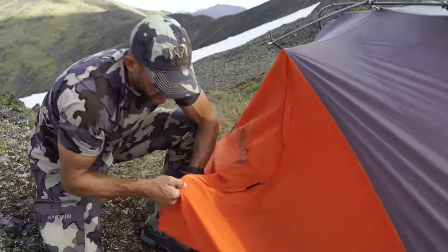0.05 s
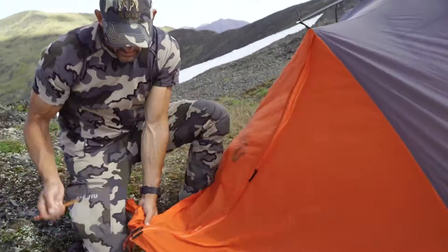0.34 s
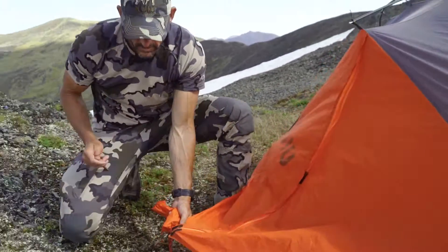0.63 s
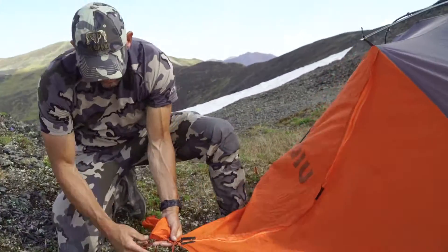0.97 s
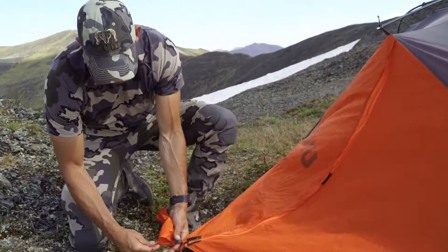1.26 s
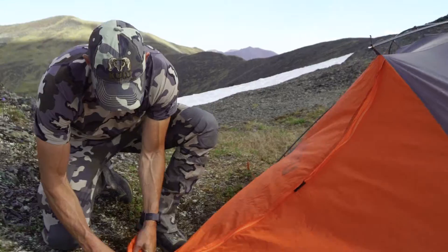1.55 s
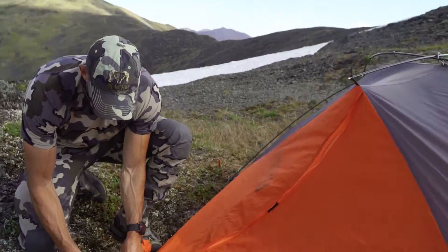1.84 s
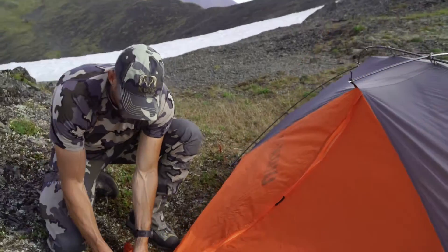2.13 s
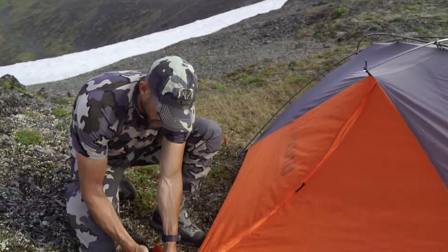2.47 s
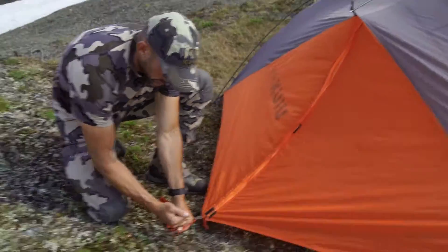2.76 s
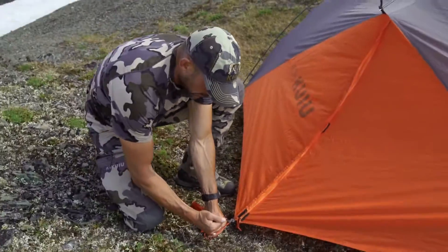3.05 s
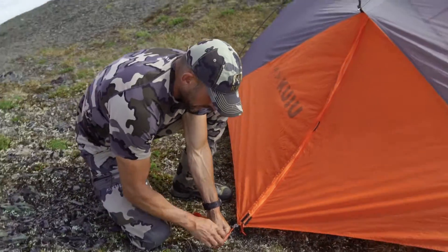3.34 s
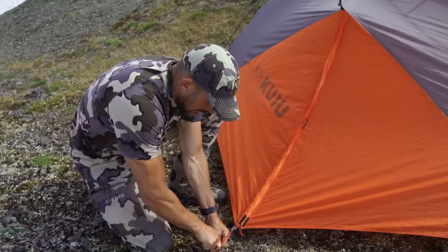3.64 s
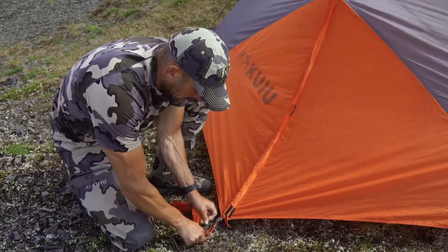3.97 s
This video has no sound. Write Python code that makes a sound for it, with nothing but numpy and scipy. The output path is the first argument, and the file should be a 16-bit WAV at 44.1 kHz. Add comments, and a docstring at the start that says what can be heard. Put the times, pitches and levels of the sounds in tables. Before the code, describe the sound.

Tent fabric swishes and snaps taut, then rustles more and more quietly as it is staked down on stony ground. Faint scrapes, ticks and dull knocks follow, while wind rumbles on the microphone, harder near the end.

```python
"""Nylon swishes and crinkles as a tent door is pulled out, then snaps taut in a run of cracks.
It is staked down by hand on a stony slope: the cloth keeps sliding, more and more quietly,
knees and hands scrape the grit, pegs tick, and stones knock dully in the turf.
Wind rumbles on the microphone throughout and buffets it harder towards the end."""
import sys
import numpy as np
from scipy import signal
from scipy.fft import rfft, irfft
from scipy.io import wavfile
from scipy.ndimage import uniform_filter1d

SR = 44100
rng = np.random.default_rng(int(sys.argv[2]) if len(sys.argv) > 2 else 0)


def bounce(signal):
    """Save signal as a 16-bit WAV file at the path given by the first command-line argument."""
    frames = np.transpose(np.atleast_2d(signal))
    limited = np.clip(frames, -1, 1)
    pcm = np.round(limited * 32767).astype(np.int16)
    wavfile.write(sys.argv[1], SR, pcm)


N = 176400  # 4 seconds
TIME = np.arange(N) / SR
TOP_HZ = 15750

# The tone of sliding nylon. Each row: frequency in Hz, strength in dB.
CLOTH_TONE = [(100, -13.5), (250, 4), (600, 0.5), (1000, -0.5), (1450, 1.5), (2600, -3), (3500, -0.5),
              (4900, -8.5), (8500, -1.5), (12000, -2.5), (16000, -6.5)]
# Steady stirring that dies down as the door tightens. Each row: time in seconds, level in dB.
CLOTH_STIR = [(0, -36), (.25, -35), (.37, -42), (.49, -40.5), (.57, -47.5), (.9, -42.5), (1.05, -48.5),
              (1.3, -47.5), (2.3, -59), (2.38, -53), (2.8, -55.5), (3.05, -60), (3.4, -50.5), (3.65, -56.5),
              (4, -50.5)]
# Single slides. Each row: middle in seconds, rough length in seconds, swish in dB, treble in dB.
CLOTH_SLIDES = [(0.184, 0.043, -32, -41), (0.344, 0.036, -36.5, -42), (0.436, 0.094, -37, -40),
                (0.618, 0.065, -42, -47), (0.671, 0.019, -41, -48), (0.79, 0.19, -43, -44),
                (0.872, 0.072, -41.5, -43), (0.954, 0.057, -39, -42.5), (1.121, 0.09, -44, -46),
                (1.18, 0.063, -41, -44), (1.243, 0.039, -41, -42), (1.491, 0.1, -44.5, -47.5),
                (1.647, 0.093, -45.5, -52), (1.855, 0.22, -48.5, -53.5), (2.008, 0.082, -49, -52),
                (2.144, 0.12, -49.5, -51), (2.266, 0.21, -50, -56), (2.596, 0.069, -51, -52),
                (2.794, 0.055, -51, -62), (3.163, 0.036, -51, -52), (3.244, 0.078, -57, -50.5),
                (3.53, 0.062, -80, -57.5)]


def cloth(split_hz=6000):
    """Nylon rubs and crinkles; each slide has its own mix of lower swish and higher treble."""
    friction = undb(-2) * rng.standard_normal(N)
    nylon = moving_folds(colour(friction + undb(-3.5) * crinkles(), CLOTH_TONE))
    swish = cut(nylon, split_hz, "low", order=5)
    swish /= np.std(cut(swish, 2500, "high", order=5))  # its upper part sets the level
    treble = unit(cut(nylon, split_hz, "high", order=5))
    swish_gain = curve(CLOTH_STIR)
    treble_gain = swish_gain * undb(-6.5)
    catch = undb(1.3 * wander(per_s=55))  # sliding cloth catches and slips
    for middle, length, swish_db, treble_db in CLOTH_SLIDES:
        move = swell(middle, length) * catch
        swish_gain = np.hypot(swish_gain, undb(swish_db) * move)
        treble_gain = np.hypot(treble_gain, undb(treble_db) * move)
    return swish * swish_gain + treble * treble_gain


def crinkles(decay_s=0.00075):
    """Creases buckle at random, each with a tiny rattle of its own."""
    buckles = grains(per_s=650, spread_db=3.5)
    energy = signal.lfilter([1], [1, -np.exp(-2 / (decay_s * SR))], buckles ** 2)
    return unit(np.sqrt(energy) * rng.standard_normal(N))


def moving_folds(rest, flicker_db=2.5):
    """Moving folds shift the cloth's tone: each band, from low to high, flickers on its own."""
    out = 0
    for hz in 500 * 2 ** np.arange(5):
        band = cut(cut(rest, hz, "low")[::-1], hz, "low")[::-1]  # both ways, so it is not delayed
        out += band * undb(flicker_db * wander(per_s=30.21))
        rest = rest - band
    return out + rest


# The tone of the taut sheet. Each row: frequency in Hz, strength in dB.
SHEET_TONE = [(80, -2), (200, -3.5), (400, -1), (750, -6.5), (1000, -20.5), (1300, -14), (2500, -14),
              (3500, -16), (5500, -22.5), (11000, -30.5), (16000, -32)]
# Its cracks. Each row: start in seconds, peak in dB, decay in seconds.
SHEET_CRACKS = [(0.2514, -5, 0.0025), (0.2554, -10.5, 0.009), (0.2601, -4, 0.0031), (0.2659, -16.5, 0.012),
                (0.27, -18, 0.011)]


def snap():
    """The slack sheet pulls taut in a quick run of cracks."""
    out = np.zeros(N)
    for start, db, decay_s in SHEET_CRACKS:
        crack = colour(burst(decay_s, click=4.1), SHEET_TONE)
        add(out, start, peak(crack, db))
    return out


# Creases, pegs and grit. Each row: start in seconds, peak in dB, ring in Hz, decay in seconds.
SHARP_TICKS = [(0.0123, -12, 3500, 0.00059), (0.139, -17.5, 1360, 0.0036), (0.2513, -9.5, 11000, 0.00026),
               (0.2686, -20, 12000, .0008), (0.3075, -14, 3200, 0.0006), (.393, -20, 4600, 0.0016),
               (0.4012, -18.5, 3580, .001), (.6055, -33, 4500, 0.00097), (.667, -32, 5500, 0.0011),
               (0.732, -24, 4950, 0.002), (1.352, -32, 12100, .0005), (1.401, -33, 9200, 0.00042),
               (1.4605, -31, 9500, .0005), (1.4886, -18.5, 1760, 0.0022), (1.614, -33, 890, 0.0031),
               (2.145, -32, 3000, .002), (2.462, -31, 1250, 0.0011), (2.512, -32.5, 1770, 0.0016),
               (3.3984, -27.5, 1170, 0.0016), (3.817, -31.5, 3300, .0012)]


def ticks():
    """Brief contacts, each with one broad ring; the lower the ring, the softer the contact."""
    out = np.zeros(N)
    for start, db, hz, decay_s in SHARP_TICKS:
        tick = ring(burst(decay_s, click=0.15), hz, width=0.46)
        tick = cut(tick, min(1.8 * hz, TOP_HZ), "low")
        add(out, start, peak(tick, db))
    return out


# Stones pressed into turf. Each row: start in seconds, peak in dB, ring in Hz, decay in seconds.
STONE_KNOCKS = [(0.821, -26.5, 286, 0.0078), (0.869, -18.5, 306, 0.0063), (1.28, -25.5, 236, 0.0058),
                (1.485, -32.5, 220, 0.0081), (2.072, -23.5, 757, 0.0067), (2.0835, -29.5, 830, 0.0035),
                (2.3248, -28, 1240, 0.0037), (2.328, -26, 340, 0.0092), (2.339, -28, 1380, 0.0036),
                (2.734, -29, 740, 0.0032), (2.806, -29, 810, 0.0053), (3.324, -30, 680, 0.0062),
                (3.4706, -21, 357, 0.012)]


def knocks(muffle_hz=1500):
    """Stones knock with one short tone and a gritty rattle, muffled by turf."""
    out, t = np.zeros(N), TIME[:SR // 10]
    for start, db, hz, decay_s in STONE_KNOCKS:
        rattle = ring(burst(decay_s, click=0.98), hz, width=1)
        rattle = peak(cut(rattle, muffle_hz, "low"), 0)
        tone = undb(-4) * np.sin(2 * np.pi * hz * t) * np.exp(-t / decay_s)
        add(out, start, peak(rattle + tone, db))
    return out


# Short rasps: scrapes on grit, sliding nylon or cord, and the tail of the sheet's snap.
# Each row: start in seconds, length in seconds, level in dB before fading, centre in Hz.
RASPS = [(0.278, 0.022, -22.5, 1010), (0.63, 0.077, -34.5, 403), (0.969, 0.077, -33.5, 1270),
         (1.209, 0.074, -29.5, 1550), (1.276, 0.046, -31.5, 1490), (1.61, 0.17, -45.5, 990),
         (2.3, 0.041, -40, 1510), (2.596, 0.029, -38, 1190), (2.485, 0.41, -42, 1020),
         (2.717, 0.066, -52, 12500), (3.2, 0.14, -44, 4570), (3.311, 0.057, -30.5, 1070),
         (3.366, 0.1, -40, 970), (3.667, 0.24, -46.5, 840)]


def rasps():
    """Dense grains swell and fade in each rasp."""
    out, roughness = np.zeros(N), grains(per_s=2500, spread_db=2)
    for start, length, db, hz in RASPS:
        progress = (TIME - start) / length
        fade = np.clip(np.minimum(progress / 0.48, (1 - progress) / 0.99), 0, 1)  # quick in, slow out
        rasp = cut(ring(roughness, hz, width=1), min(1.54 * hz, TOP_HZ), "low", order=4)
        out += undb(db) * fade * unit(rasp)
    return out


# The tone of the wind's rumble. Each row: frequency in Hz, strength in dB.
RUMBLE_TONE = [(8, -28), (18, 12), (32, 6), (55, -4), (80, -15), (130, -25.5), (300, -37.5), (1000, -95.5)]
# Its rise and fall. Each row: time in seconds, level in dB.
RUMBLE_LEVELS = [(0, -18.5), (.35, -26), (.6, -16.5), (1.05, -17.5), (1.35, -24.5), (1.75, -21.5),
                 (1.9, -24.5), (2.08, -14.5), (2.2, -24), (2.55, -27), (2.72, -18), (3.3, -20),
                 (3.55, -14.5), (4, -12)]


def rumble(sway_db=2):
    """Wind swirls on the microphone in a deep rumble that sways in strength."""
    pressure = steady(colour(rng.standard_normal(N), RUMBLE_TONE))
    return pressure * curve(RUMBLE_LEVELS) * undb(sway_db * wander(per_s=5.5))


# Gusts. Each row: middle in seconds, rough length in seconds, level in dB, upper edge in Hz.
WIND_GUSTS = [(0.428, 0.092, -27.5, 112), (0.87, 0.2, -26.5, 117), (1.086, 0.36, -26.5, 74),
              (2.789, 0.14, -38, 226), (2.954, 0.064, -22.5, 71.5), (3.091, 0.14, -20.5, 81.5),
              (3.515, 0.21, -16.5, 90), (3.702, 0.08, -17.5, 97), (3.952, 0.36, -11.5, 113)]


def gusts():
    """Gusts buffet the microphone with swells of low noise."""
    out = np.zeros(N)
    turbulence = cut(rng.standard_normal(N), hz=55.4, kind="high", order=3)
    for middle, length, db, hz in WIND_GUSTS:
        out += undb(db) * swell(middle, length) * steady(cut(turbulence, hz, "low", order=4))
    return out


# Low thumps. Each row: middle in seconds, level in dB before fading, pitch in Hz, width in seconds.
LOW_THUMPS = [(0.825, -12, 136, 0.0017), (.872, -10, 69, 0.0056), (1.241, -23.5, 150, 0.0014),
              (1.475, -22, 112, 0.0027), (1.589, -25, 115, 0.0054), (1.631, -30, 166, 0.0024),
              (3.378, -8.5, 96, 0.0032), (3.473, -3, 134, 0.0024), (3.49, -8, 106, 0.0033)]


def thumps():
    """Each thump at the microphone is a low tone that fades in and out almost at once."""
    out = np.zeros(N)
    for middle, db, hz, width in LOW_THUMPS:
        t = TIME - middle
        out += undb(db) * np.sin(2 * np.pi * hz * t) * np.exp(-.5 * (t / width) ** 2)
    return out


# The tone of distant air. Each row: frequency in Hz, strength in dB.
AIR_TONE = [(100, 7), (300, 10), (800, 6.5), (1400, 2), (2600, -25), (3600, -13), (5000, -32), (16000, -19)]


def distant_air():
    """Air over the slope makes a faint, even hush."""
    return undb(-58) * unit(colour(rng.standard_normal(N), AIR_TONE))


def undb(db):
    """Turn decibels into a gain."""
    return 10 ** (np.asarray(db) / 20)


def unit(x):
    """Scale to an average strength (rms) of 1."""
    return x / np.sqrt(np.mean(x ** 2) + 1e-20)


def steady(x, window_s=0.0777):
    """Hold a noise to an even strength."""
    return x / np.sqrt(uniform_filter1d(x ** 2, int(window_s * SR)) + 1e-18)


def peak(x, db):
    """Scale to a peak level."""
    return x * undb(db) / np.abs(x).max()


def curve(rows):
    """Join rows of seconds and dB into a gain over time."""
    seconds, db = np.array(rows).T
    return undb(np.interp(TIME, seconds, db))


def swell(middle_s, length_s, softness=4.9):
    """A movement that starts, peaks and stops smoothly."""
    position = (TIME - middle_s) / (length_s * np.sqrt(softness))
    return np.abs(np.cos(np.pi * np.clip(position, -.5, .5))) ** softness


def colour(x, points):
    """Give a sound the tone set by rows of Hz and dB."""
    hz, db = np.array(points).T
    size = 2 * len(x)
    freqs = np.maximum(np.fft.rfftfreq(size, 1 / SR), 1)
    gain = undb(np.interp(np.log(freqs), np.log(hz), db))
    cepstrum = irfft(np.log(gain))  # folded next, so nothing rings before its cause
    cepstrum[1:size // 2] *= 2
    cepstrum[size // 2 + 1:] = 0
    return irfft(rfft(x, size) * np.exp(rfft(cepstrum)))[:len(x)]


def cut(x, hz, kind, order=2):
    """Keep the "low" or the "high" side of a frequency."""
    return signal.sosfilt(signal.butter(order, hz, kind, fs=SR, output="sos"), x)


def ring(x, hz, width):
    """One resonance; its width is a share of its centre frequency."""
    angle = 2 * np.pi * hz / SR
    damping = np.sin(angle) * width / 2
    return signal.lfilter([damping, 0, -damping], [1 + damping, -2 * np.cos(angle), 1 - damping], x)


def wander(per_s):
    """A smooth random drift, about 1 in size."""
    hold = int(SR / per_s)
    steps = np.repeat(rng.standard_normal(N // hold + 1), hold)
    return unit(uniform_filter1d(steps, hold)[:N])


def grains(per_s, spread_db, range_db=14.5):
    """Tiny random clicks, mostly weak and a few strong."""
    size = undb(np.minimum(spread_db * rng.exponential(size=N), range_db))
    hits = rng.random(N) < per_s / SR
    return unit(hits * size * rng.choice([-1, 1], N))


def burst(decay_s, click):
    """A click followed by a dying rattle."""
    t = TIME[:SR // 10]
    x = rng.standard_normal(len(t)) * np.exp(-t / decay_s)
    x[0] = 2 * click
    return x


def add(out, start_s, x):
    """Mix a sound in at a time."""
    i = int(start_s * SR)
    out[i:i + len(x)] += x[:N - i]


def scene(overload=0.8):
    """Tent, ground and wind meet at one microphone, which rounds off the wind's peaks."""
    pitching = cloth() + rasps() + snap() + ticks() + knocks()
    wind = overload * np.tanh((rumble() + gusts() + thumps()) / overload)
    return (pitching + wind + distant_air())[None]


def record(dry, fade_out_s=0.012):
    """The sound eases in and out and loses its very highest treble."""
    ramp = np.minimum(4 * TIME, TIME[::-1]) / fade_out_s  # in four times as fast as out
    fade = np.sin(np.pi / 2 * np.minimum(ramp, 1)) ** 2
    return signal.sosfilt(signal.ellip(10, .2, 80, TOP_HZ, fs=SR, output="sos"), dry * fade)


dry = scene()
out = record(dry)
bounce(out)
```